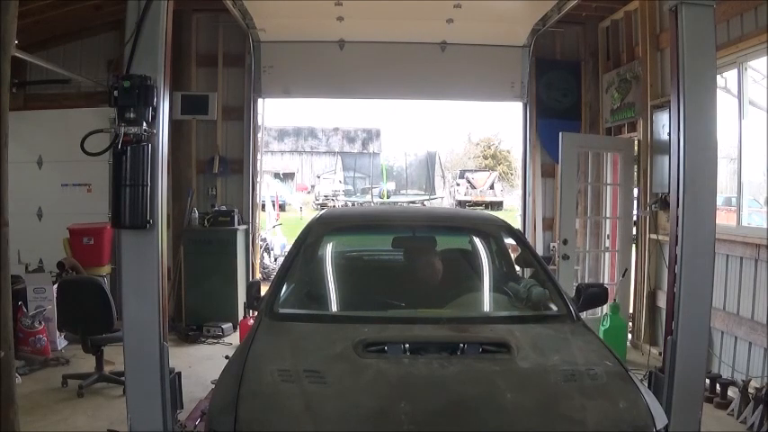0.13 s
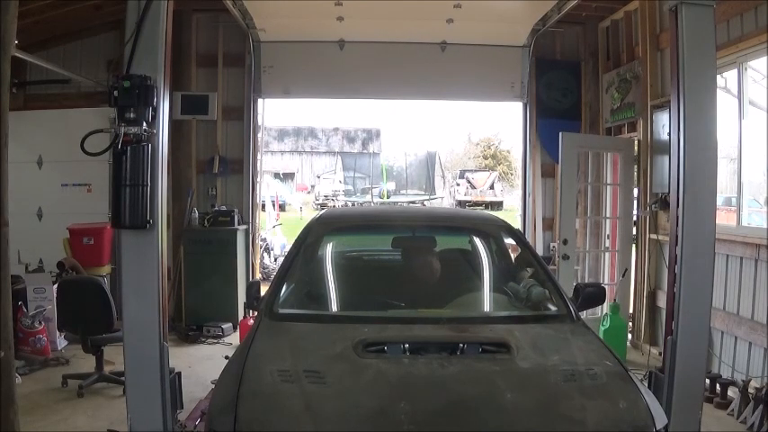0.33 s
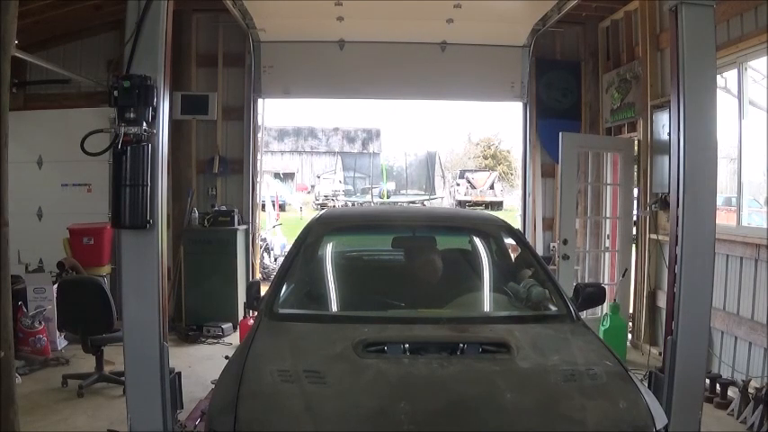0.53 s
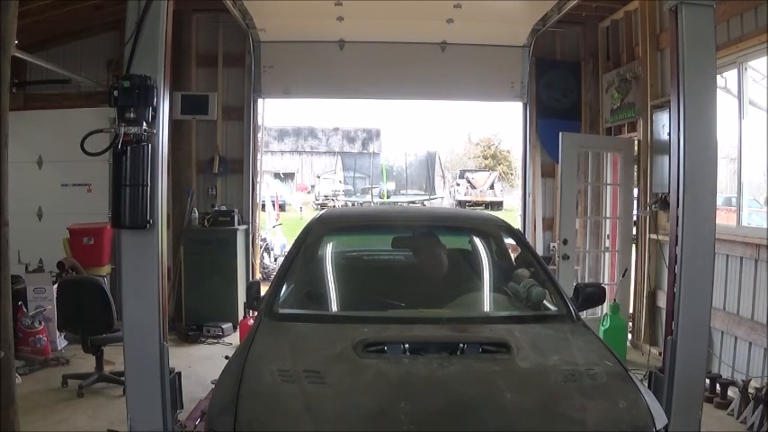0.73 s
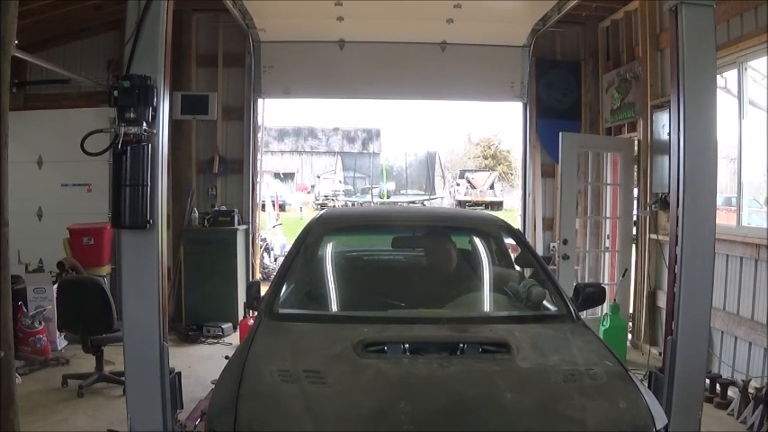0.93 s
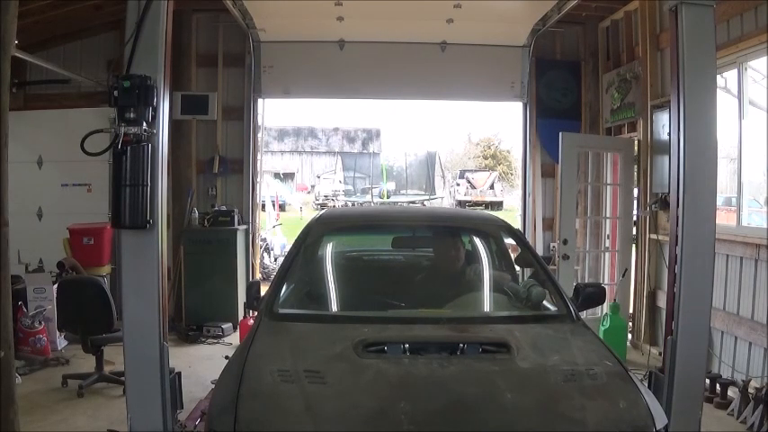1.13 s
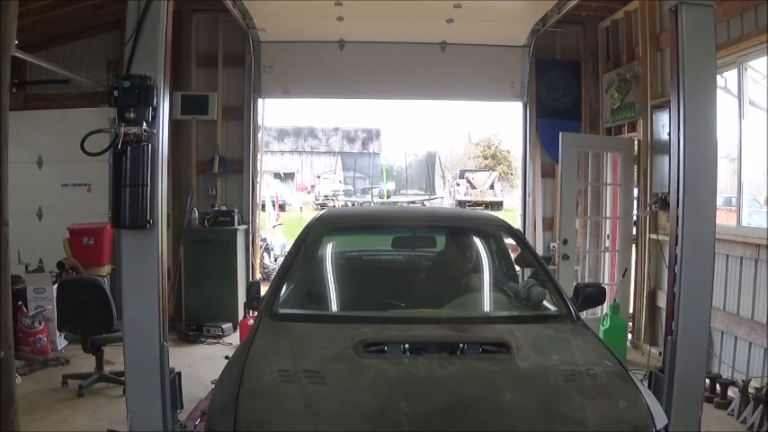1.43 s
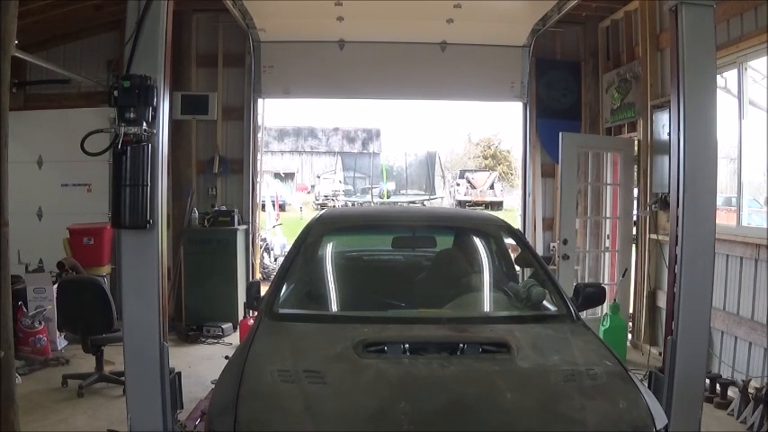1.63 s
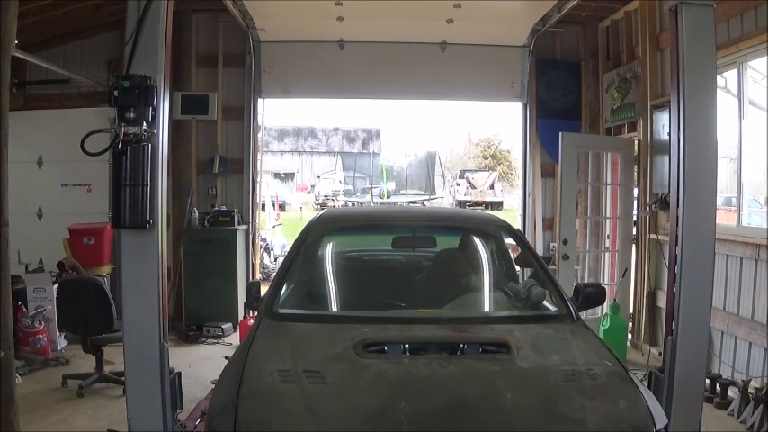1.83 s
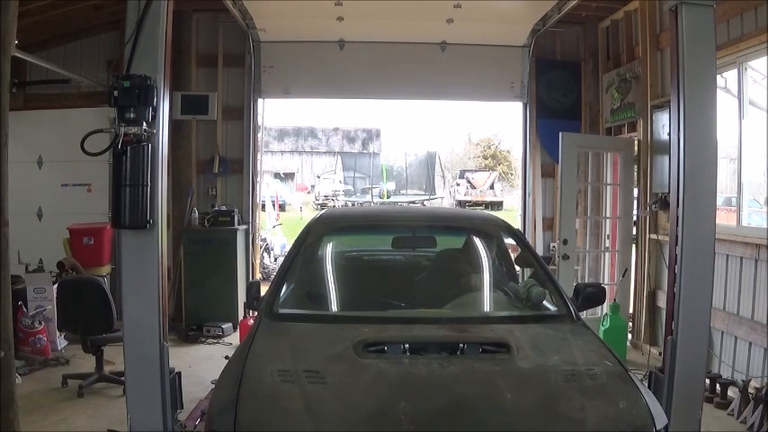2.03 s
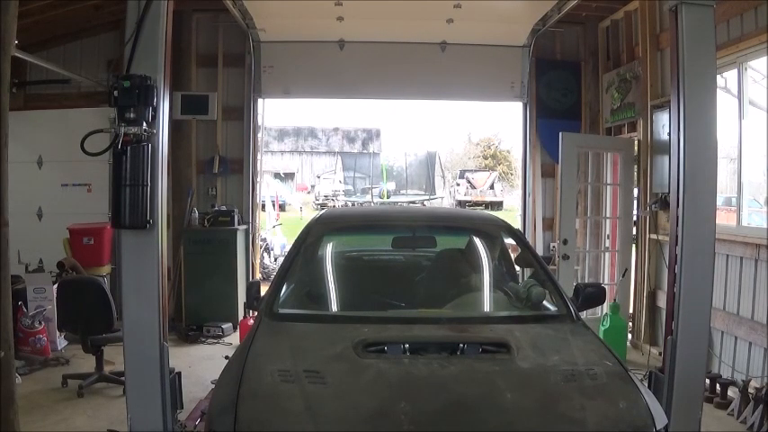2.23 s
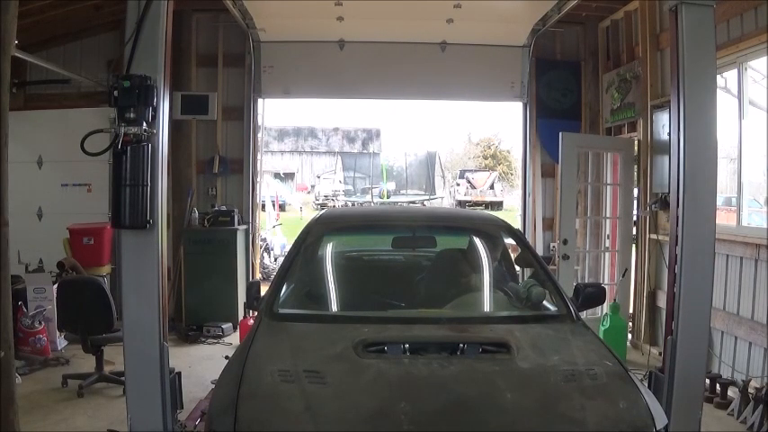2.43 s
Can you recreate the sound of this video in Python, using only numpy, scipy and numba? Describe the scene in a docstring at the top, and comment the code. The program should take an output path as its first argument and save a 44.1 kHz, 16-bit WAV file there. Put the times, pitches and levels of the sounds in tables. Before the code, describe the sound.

Heavy car door slam booming through a garage, followed by light knocks, small clicks and muffled thumps

```python
"""Over quiet room noise and a thin whine, the hiss is slightly louder at first; a faint squeak and a click precede
the swing of a car door. It slams in a garage, a few metres off: seal, latch and rebounds are short coloured
noise bursts, door panels and cabin boom as decaying sine modes, and dying echoes ring on while a recorder's
limiter holds the peak down. Then the driver shifts about inside: shaped noise makes rustles and soft rumbles,
noise bursts make light knocks, small clicks and dull thumps, and narrow bands of noise make faint squeaks."""
import sys
import numpy as np
from scipy import signal
from scipy.fft import rfft, irfft
from scipy.io import wavfile
from scipy.ndimage import uniform_filter1d
from numba import njit

SR = 44100
rng = np.random.default_rng(int(sys.argv[2]) if len(sys.argv) > 2 else 0)


def inscribe(sig):
    """Save sig as 16-bit PCM at rate SR to the path in sys.argv[1].

    A 1-D sig is mono; a 2-D sig holds one channel per row.
    Samples are clipped to [-1, 1] before scaling.
    """
    pcm = np.round(np.clip(np.atleast_2d(sig).T, -1, 1) * 32767)
    wavfile.write(sys.argv[1], SR, pcm.astype(np.int16))


N = 114660


def undb(db):
    """Logarithmic level: 20 dB is a factor of ten in amplitude."""
    return 10 ** (np.asarray(db) / 20)


def curve(points, hz):
    """Logarithmic frequency scale: values are interpolated evenly per octave."""
    f, v = np.array(points).T
    return np.interp(np.log(np.maximum(hz, 1)), np.log(f), v)


def bins():
    """Fourier analysis: the frequencies of the spectrum in Hz."""
    return np.arange(N // 2 + 1) * SR / N


def convolve(x, response):
    """Linear superposition: every sample launches its own copy of the response."""
    return signal.fftconvolve(np.atleast_2d(x), np.atleast_2d(response), axes=-1)[:, :N]


def colour(x, points):
    """Minimum-phase filtering: a spectrum shapes the sound without pre-echo; white noise keeps its power."""
    gain = undb(curve(points, bins()))
    unit_power_gain = gain / np.sqrt(np.mean(gain ** 2))
    # folding the cepstrum onto positive time gives minimum phase
    cepstrum = irfft(np.log(unit_power_gain), N)
    cepstrum[1:N // 2] *= 2
    cepstrum[N // 2 + 1:] = 0
    response = irfft(np.exp(rfft(cepstrum)), N)[:N // 10]
    return convolve(x, response)


def narrow(hz, width_hz):
    """Narrow-band noise: a thin band of frequencies is heard as a wavering tone, here of unit level."""
    band = np.exp(-((bins() - hz) / width_hz) ** 2)
    x = irfft(rfft(rng.standard_normal(N)) * band, N)
    return x / x.std()


def swell(at, width):
    """Gaussian envelope: a smooth rise and fall, its width a standard deviation in seconds."""
    return np.exp(-.5 * ((np.arange(N) / SR - at) / width) ** 2)


# Stereo spread of the echoes and most noises. Each row: frequency in Hz, side level in dB relative to mid.
STEREO_WIDTH = [(60, -40.5), (130, -50), (300, -15), (700, -9), (1300, -5.5), (2400, -9.5), (5000, -7.5),
                (9000, -8.5), (13000, -39)]


def diffuse(width=STEREO_WIDTH):
    """Diffuse field: independent mid and side noise differ less between the ears where the side is weak."""
    mid, side = rng.standard_normal((2, N))
    side = irfft(rfft(side) * undb(curve(width, bins())), N)
    return np.array([mid + side, mid - side])


# Reverberation time of the garage. Each row: frequency in Hz, time to decay by 60 dB in seconds.
GARAGE_T60 = [(40, 0.58), (150, .66), (500, 0.59), (1500, 0.54), (3500, 0.53), (7000, 0.35), (12000, 0.34)]
GARAGE_SWELL_S = 0.0041
ECHO_GRAIN = 0.62  # spread of the echoes' log amplitude
EVEN_BELOW_HZ = 760  # the evening of the echoes' colour fades out above this


def garage(direct_db):
    """Reverberation: direct sound, then echoes that swell and decay exponentially at a rate set by frequency."""
    t = np.arange(N) / SR
    grain = np.exp(ECHO_GRAIN * np.repeat(rng.standard_normal(N // 32 + 1), 32)[:N])
    echoes = rfft(diffuse() * grain)
    centres = [hz for hz, _ in GARAGE_T60]
    tail = 0
    for share, (_, t60) in zip(np.eye(len(centres)), GARAGE_T60):
        # overlapping bands that add up to the whole spectrum
        band = curve(list(zip(centres, share)), bins())
        tail = tail + irfft(echoes * band, N) * np.exp(-np.log(1000) * t / t60)
    tail = tail * (1 - np.exp(-t / GARAGE_SWELL_S))
    power = uniform_filter1d(np.mean(np.abs(rfft(tail)) ** 2, axis=0), size=64)
    evening_db = -10 * np.log10(power / np.median(power)) / (1 + (bins() / EVEN_BELOW_HZ) ** 2)
    tail = colour(tail, np.column_stack([bins() + 1, evening_db]))
    response = tail / np.sqrt(np.mean(np.sum(tail ** 2, axis=1)))
    response[:, 0] += undb(direct_db)  # level relative to the whole energy of the echoes
    return response


SNAP = 0.44  # greatest first push, relative to the chatter


def chatter(rise, length):
    """Impact excitation: a run of contacts with a near-even spectrum and unit energy; fast rises add a snap."""
    t = np.arange(8192) / SR
    onset = 1 - np.exp(-t / rise)
    x = rng.standard_normal(len(t)) * onset ** 2 * np.exp(-t / length)
    # keep only the phases, so all frequencies are equally strong
    flat = irfft(np.exp(1j * np.angle(rfft(x))))
    x = flat * onset * np.exp(-(t / (4 * length)) ** 2)
    x = x / np.linalg.norm(x)
    x[0] += SNAP * np.exp(-rise / .0005)
    return x / np.linalg.norm(x)


def blows(rows, spectrum, direct_db):
    """Source and path: each force burst takes the colour of what is struck, then the response of the room."""
    force = np.zeros(2 * N)
    for at, db, rise, length in rows:
        burst, start = chatter(rise, length), int(at * SR)
        force[start:start + len(burst)] += undb(db) * burst
    return convolve(colour(force[:N], spectrum), garage(direct_db))


def two_part(rows, low, high, direct_db, low_db=0, high_db=0):
    """Coupled excitation: the same blows stir both a heavy body and its light fittings."""
    low_rows = [(at, db + low_db, rise, length) for at, db, _, rise, length in rows]
    high_rows = [(at, db + high_db, rise, length) for at, _, db, rise, length in rows]
    return blows(low_rows, low, direct_db) + blows(high_rows, high, direct_db)


# Colour of the room noise. Each row: frequency in Hz, relative level per Hz in dB.
AIR_SPECTRUM = [(25, -4.5), (55, 4.5), (80, -8), (107, 3.5), (200, -7), (470, -7.5), (900, -11),
                (1700, -13.5), (3300, -15), (7000, -20.5), (11000, -22), (15500, -25)]
# Stereo spread of the room noise. Each row: frequency in Hz, side level in dB relative to mid.
AIR_WIDTH = [(60, -24), (110, -25), (200, -7), (400, -3.5), (1300, 0.5), (2400, -2.5), (4400, -6),
             (8000, -7), (12000, -28)]
AIR_DB = -55.5
WHINE_HZ, WHINE_DB = 7850, -74.5


def air():
    """Stationary noise: steady coloured room noise and hiss, with a narrow-band high whine."""
    hiss = undb(AIR_DB) * colour(diffuse(AIR_WIDTH), AIR_SPECTRUM)
    whine = undb(WHINE_DB) * narrow(WHINE_HZ, 64.6)
    return hiss + whine


# Colours of the low and the high noise. Each row: frequency in Hz, relative level per Hz in dB.
LOW_NOISE_SPECTRUM = [(25, 3.5), (60, 4.5), (130, 1), (270, -8), (400, -13.5), (1000, -46), (3000, -40),
                      (12000, -81)]
HIGH_NOISE_SPECTRUM = [(100, 15), (1000, -3), (3000, -6.5), (7000, -8), (10000, -11.5), (15000, -27.5)]


def noise_swells(rows):
    """Amplitude modulation: low and high coloured noise rise and fall under the same smooth envelopes."""
    low_level = sum(undb(db) * swell(at, width) for at, width, db, _ in rows)
    high_level = sum(undb(db) * swell(at, width) for at, width, _, db in rows)
    low = colour(diffuse(), LOW_NOISE_SPECTRUM) * low_level
    high = colour(diffuse(), HIGH_NOISE_SPECTRUM) * high_level
    return low + high


# Swells of noise: the first row is the early hiss, the others are rustles of movement and soft rumbles.
# Each row: middle in seconds, width in seconds, low noise in dB, high noise in dB.
NOISE_SWELLS = [(.08, 0.16, -63, -51.5), (.665, 0.048, -49, -45.5), (.86, .12, -50.5, -82),
                (1.18, 0.17, -51.5, -68), (1.61, 0.085, -65, -52), (2.26, 0.028, -64, -54)]


def early_hiss():
    """Enveloped noise: the hiss is slightly louder before the slam."""
    return noise_swells(NOISE_SWELLS[:1])


def rustle_and_rumble():
    """Broadband and low noise: rustles of movement, and a soft rumble as the car rocks."""
    return noise_swells(NOISE_SWELLS[1:])


# Faint squeaks. Each row: middle in seconds, width in seconds, pitch in Hz, level in dB.
SQUEAKS = [(0.047, 0.0042, 2720, -52.5), (1.225, 0.019, 1760, -56.5), (1.43, 0.035, 2820, -66.5)]


def squeaks():
    """Narrow-band sound: wavering tones swell and fade."""
    return sum(undb(db) * swell(at, width) * narrow(hz, 100) for at, width, hz, db in SQUEAKS)


# Small sharp clicks. Each row: start in seconds, level in dB, rise in seconds, length in seconds.
CLICKS = [(.1355, -19, 0.00015, 0.0057), (1.532, -29, 0.0045, 0.02), (1.572, -22, .003, 0.0098),
          (1.60, -27.5, 0.004, .02), (2.126, -33.5, 0.0016, 0.0078), (2.303, -33, 0.00089, 0.012)]
# Colour of a click. Each row: frequency in Hz, relative level per Hz in dB.
CLICK_SPECTRUM = [(200, -21), (1500, -21.5), (2800, -10), (4000, -2), (5300, -5.5), (7200, 5), (9000, -4),
                  (10500, -3.5), (12500, -14.5), (16000, -11)]


def clicks():
    """Brief impacts: small contacts with most of their energy in the treble."""
    return blows(CLICKS, CLICK_SPECTRUM, direct_db=4)


# Light knocks on the trim. Each row: start in seconds, hollow body in dB, clack in dB,
# rise in seconds, length in seconds.
KNOCKS = [(.989, -25.5, -14, 0.0032, .016), (1.010, -35, -14.5, 0.0038, 0.022),
          (1.028, -11.5, -26, 0.0025, 0.014)]
# Colours of body and clack. Each row: frequency in Hz, relative level per Hz in dB.
KNOCK_BODY = [(50, -1), (130, -1), (250, -4.5), (500, 2.5), (750, -2.5), (1150, -6.5), (1900, -22),
              (5000, -25), (15000, -64)]
KNOCK_CLACK = [(100, -10), (550, -18), (760, 10), (920, -6.5), (1250, 3.5), (1900, -6.5), (3000, -7),
               (4700, -8.5), (7000, -14.5), (10500, -13.5), (15000, -32)]


def knocks():
    """Impact on a hollow body: each light blow gives a low body sound and a brighter clack."""
    return two_part(KNOCKS, KNOCK_BODY, KNOCK_CLACK, direct_db=-0.5)


# Dull thumps through the body. Each row: start in seconds, boom in dB, panel rattle in dB,
# rise in seconds, length in seconds.
THUMPS = [(1.666, -21.5, -25, 0.0093, 0.012), (2.290, -12.5, -20, 0.0037, 0.0048),
          (2.300, -7, -12.5, 0.0053, 0.014), (2.334, -7, -18, .003, .005),
          (2.408, -20, -28.5, 0.006, 0.011)]
# Colours of boom and rattle. Each row: frequency in Hz, relative level per Hz in dB.
THUMP_SPECTRUM = [(30, -9), (70, -15), (110, -5.5), (160, 2), (200, -4), (260, -1), (400, -13.5),
                  (650, -28), (2000, -33), (12000, -70)]
RATTLE_SPECTRUM = [(100, -11), (400, 2), (700, -1.5), (1000, 1), (1500, -4.5), (2200, -9.5), (3200, -18),
                   (5000, -20), (12000, -38)]


def thumps():
    """Structure-borne impact: soft blows give a low boom and a panel rattle."""
    return two_part(THUMPS, THUMP_SPECTRUM, RATTLE_SPECTRUM, direct_db=2)


def driver():
    """Superposition: the sounds of someone moving in the car add up."""
    return rustle_and_rumble() + squeaks() + clicks() + knocks() + thumps()


# Colour of the swing. Each row: frequency in Hz, relative level per Hz in dB.
SWING_SPECTRUM = [(30, -9), (90, -16.5), (150, 12.5), (210, -5.5), (270, 2.5), (380, -10), (900, -13.5),
                  (2000, -24), (8000, -35.5)]
SWING_S, SWING_WIDTH_S, SWING_DB = .16, 0.098, -44.5


def swing():
    """Enveloped noise: the swinging door is a soft coloured noise that rises and falls."""
    return undb(SWING_DB) * swell(SWING_S, SWING_WIDTH_S) * colour(diffuse(), SWING_SPECTRUM)


# Blows of the closing door: seal, first latch catch, latch home, then rebounds. Each row: start in seconds,
# thud in dB and metal clash in dB (both before the gains in slam), rise in seconds, length in seconds.
SLAM = [(.229, -15.5, -43.5, 0.0023, 0.022), (.236, -1.5, -5, 0.0044, 0.02), (.254, -2, 2, 0.0018, .014),
        (.286, -6, -14.5, 0.0042, 0.021), (.314, -3, -5, 0.0021, 0.023), (.346, -0.5, -13.5, 0.002, 0.016)]
# Colours of thud and clash. Each row: frequency in Hz, relative level per Hz in dB.
THUD_SPECTRUM = [(25, -32), (55, -11.5), (78, -19), (105, -4.5), (160, -2), (240, -5.5), (320, -6),
                 (450, -8), (800, -15), (1300, -21), (2000, -23), (4000, -38), (12000, -63)]
CLASH_SPECTRUM = [(100, -10.5), (400, 7), (850, 7), (1300, -1), (1850, 1.5), (2500, -3), (3300, -3.5),
                  (4600, -9.5), (6500, -8), (9000, -14), (12000, -22), (16000, -46)]


def slam():
    """Impact series: each blow gives the thud of the heavy door and the clash of latch and fittings."""
    return two_part(SLAM, THUD_SPECTRUM, CLASH_SPECTRUM, direct_db=-6.5, low_db=21.5, high_db=18)


# Modes of cabin and door panels. Each row: frequency in Hz, level in dB, time to decay by 60 dB in seconds,
# swell in seconds.
DOOR_MODES = [(37.9, -13, 0.71, 0.098), (96.5, -20, 0.71, .01), (121.6, -14.5, 0.85, .025),
              (143.7, -10, 0.25, 0.0017), (170.6, -9, .36, 0.0036), (186.5, 4.5, 0.44, 0.062),
              (213, -21, 0.93, 0.028), (310, -14, 0.37, 0.027), (394.3, -17.5, 0.75, 0.099),
              (458, -27.5, 0.88, 0.034), (517.7, -14.5, 0.47, 0.023), (622, -40, 0.42, 0.01),
              (890, -13.5, 0.45, .015), (1154, -30, 0.507, 0.015), (1686, -27.5, 0.63, 0.023),
              (1894, -27.5, 0.77, .02), (3182, -30, 0.35, 0.026)]
BOOM_START_S = .238
MODE_SPREAD = 0.47  # phase shift of each side at 500 Hz, in radians


def boom():
    """Modal resonance: panels and cabin ring as sines that swell and decay, out of step between the sides."""
    t = np.maximum(np.arange(N) / SR - BOOM_START_S, 0)
    ringing = 0
    for hz, db, t60, rise in DOOR_MODES:
        lag = MODE_SPREAD * np.sqrt(hz / 500) * rng.choice([-1, 1]) * np.array([[1], [-1]])
        envelope = (1 - np.exp(-t / rise)) * np.exp(-np.log(1000) * t / t60)
        ringing = ringing + undb(db) * np.sin(2 * np.pi * hz * t + lag) * envelope
    return ringing


# Stereo balance of slam and boom. Each row: frequency in Hz, left minus right in dB.
DOOR_BALANCE = [(60, -1), (110, 3), (200, -2.5), (380, -1.5), (700, -2.5), (2400, -1.5), (8000, -1),
                (15000, 0)]


def door():
    """Interaural level difference: slam and boom lean to one side by frequency; the swing does not."""
    lean_db = curve(DOOR_BALANCE, bins()) / 2
    leaning = irfft(rfft(slam() + boom()) * undb([lean_db, -lean_db]), N)
    return swing() + leaning


def scene():
    """Superposition: room noise, driver and door add up in the garage."""
    return air() + early_hiss() + driver() + door()


@njit
def follow(x, attack, release):
    """Envelope following: the level rises fast and falls slowly."""
    out, e = np.empty(len(x)), 0.
    for i in range(len(x)):
        e += (x[i] - e) * (attack if x[i] > e else release)
        out[i] = e
    return out


LIMIT_DB, LIMIT_RATIO = -3.5, 3.5
LIMIT_ATTACK_S, LIMIT_RELEASE_S = .002, 0.027
CEILING = 0.94  # amplitude that the rounded peaks approach
TOP_HZ = 15800


def record(dry):
    """Dynamic range compression: a limiter holds the slam down, peaks are rounded and the top is cut."""
    loudest_side = np.abs(dry).max(axis=0)
    envelope = follow(loudest_side, 1 / (LIMIT_ATTACK_S * SR), 1 / (LIMIT_RELEASE_S * SR))
    excess = np.maximum(envelope / undb(LIMIT_DB), 1)
    held = dry * excess ** (1 / LIMIT_RATIO - 1)
    rounded = CEILING * np.tanh(held / CEILING)
    low_pass = signal.ellip(10, .1, 80, TOP_HZ, fs=SR, output="sos")
    return signal.sosfilt(low_pass, rounded)


dry = scene()
out = record(dry)
inscribe(out)
```